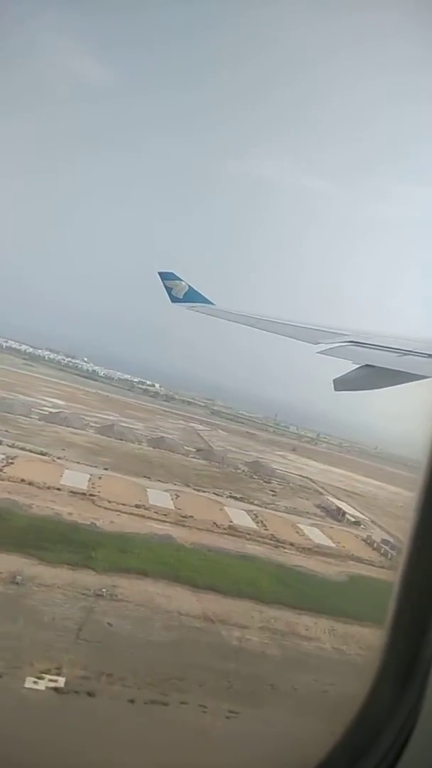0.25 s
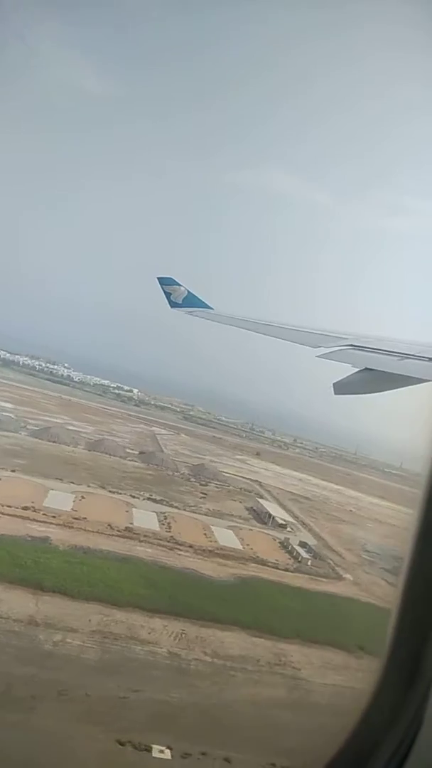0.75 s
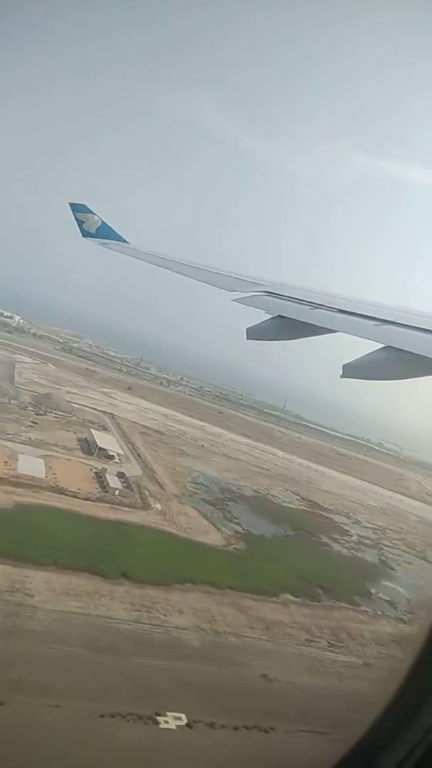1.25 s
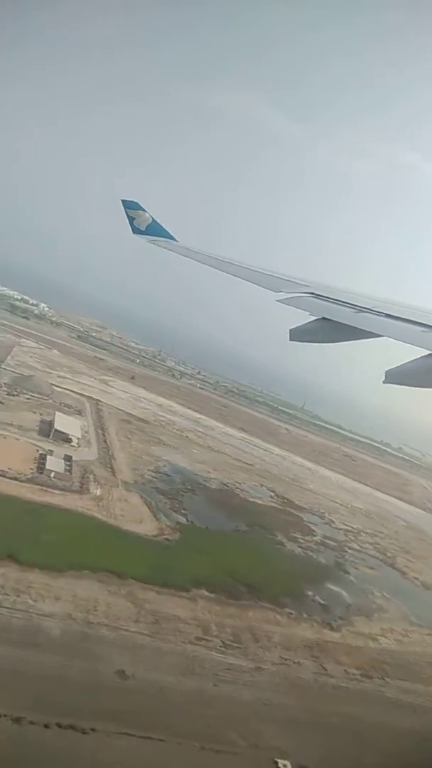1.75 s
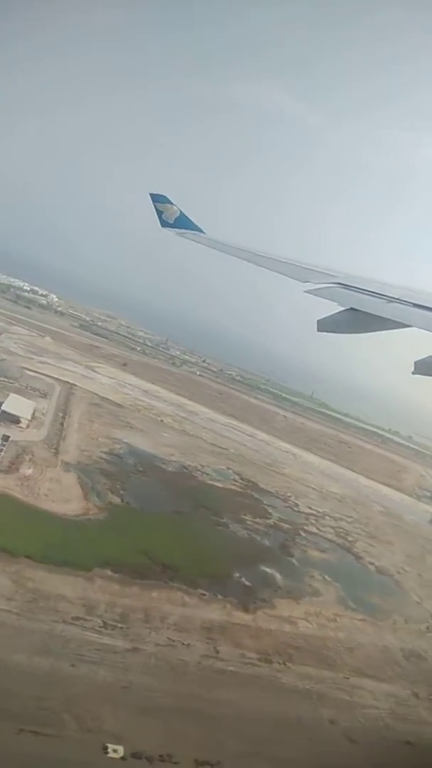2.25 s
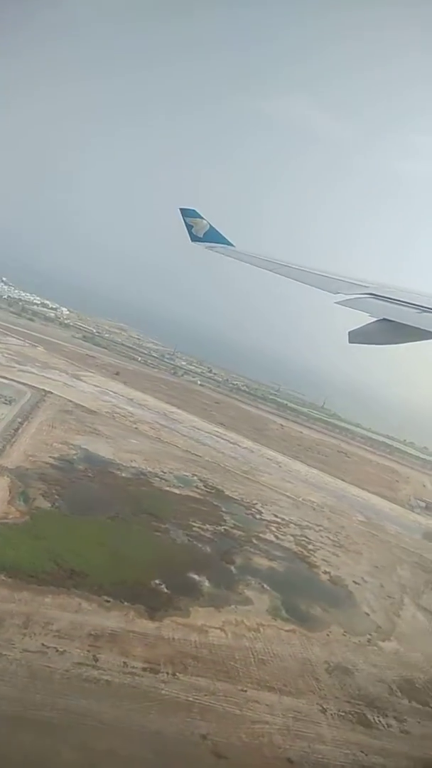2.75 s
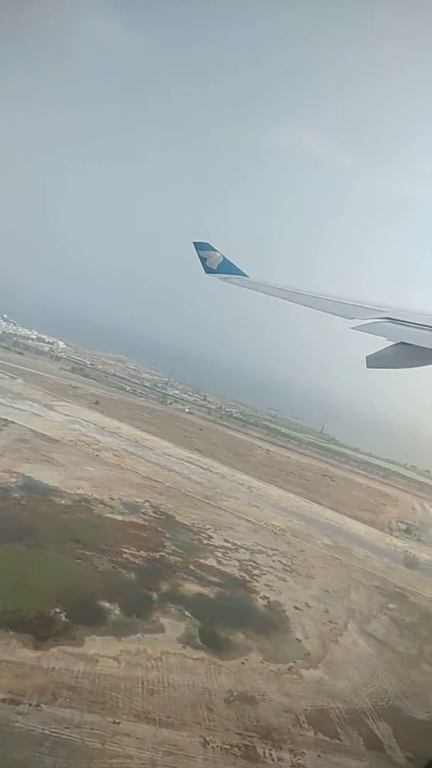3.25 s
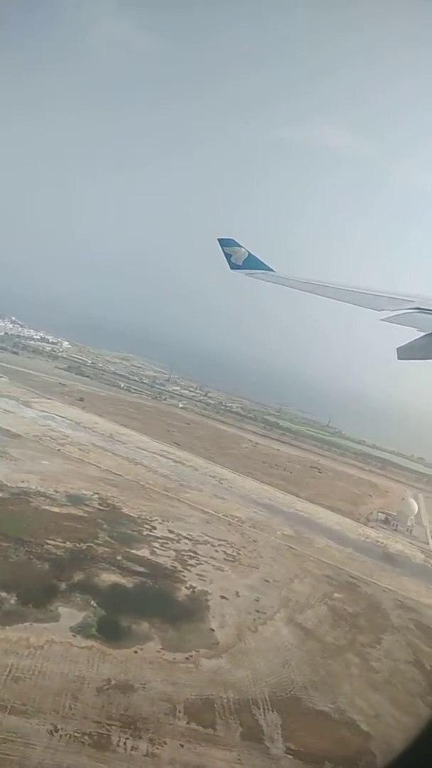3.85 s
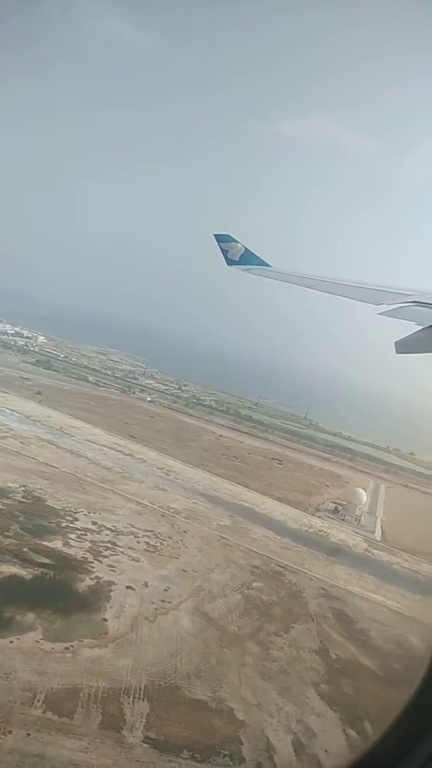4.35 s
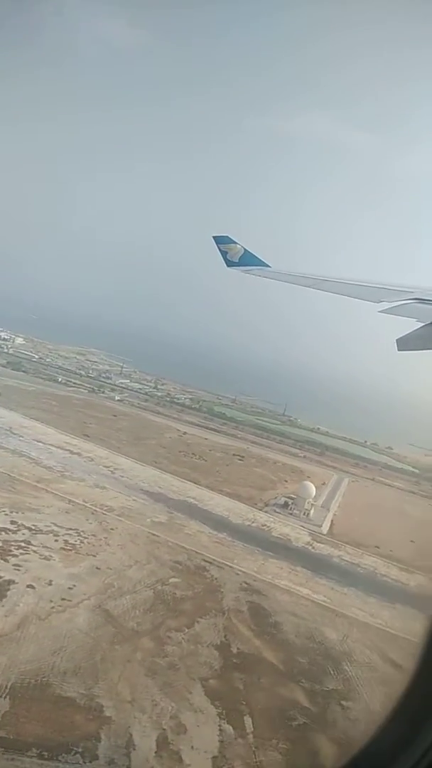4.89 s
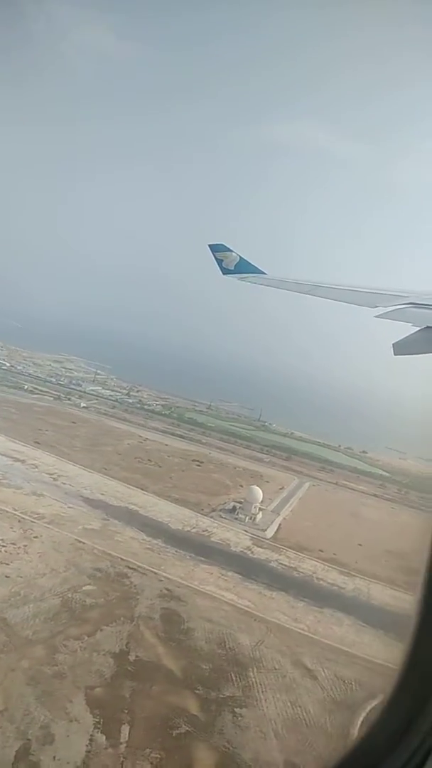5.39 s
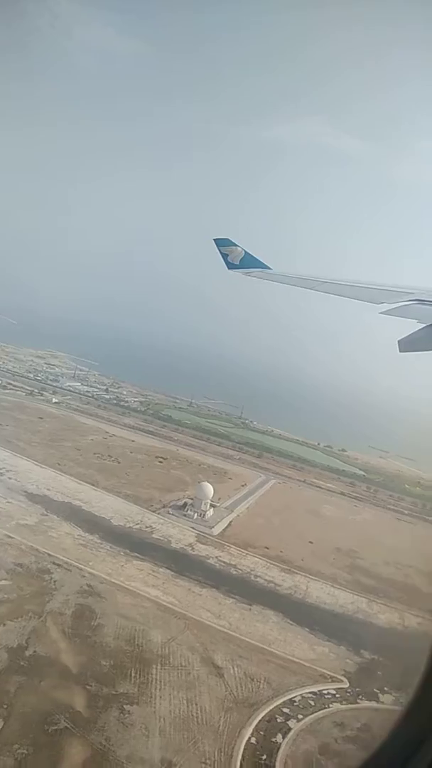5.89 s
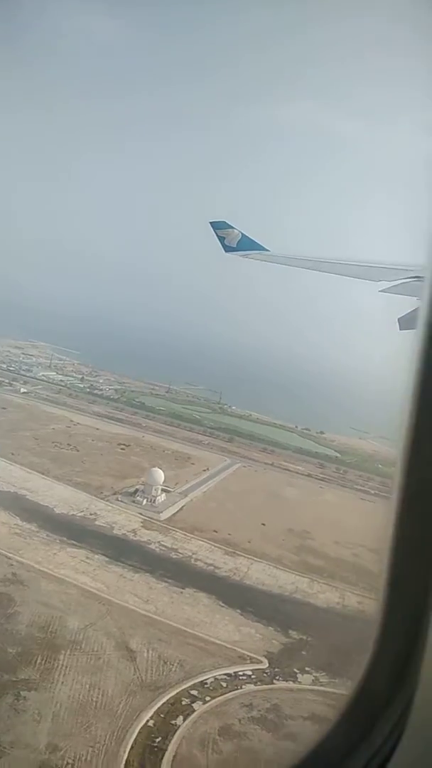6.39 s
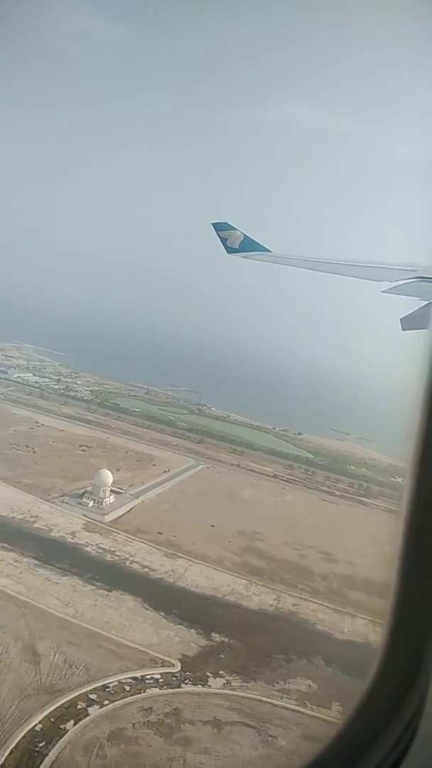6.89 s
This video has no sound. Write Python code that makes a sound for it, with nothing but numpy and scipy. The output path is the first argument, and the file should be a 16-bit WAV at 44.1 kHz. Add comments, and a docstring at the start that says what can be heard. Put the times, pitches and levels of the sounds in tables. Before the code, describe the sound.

Loud, low jet rumble wavers steadily inside an airliner cabin, with faint vent hiss and small handling rustles and ticks close to the microphone.

```python
"""Airliner cabin in the climb

Jet roar comes through the wall as a low, wavering rumble, to a phone held near the window; the window
recess colours it differently at each of two microphones. Air vents hiss: all are noise shaped in frequency.
The phone tilts and a hand rustles over it, lifting bands of that noise; fingers tick and ring the case,
loose trim crackles in tiny high clicks. A gate turns down weak treble bands and a limiter holds the peaks."""
import sys
import numpy as np
from scipy import signal
from scipy.io import wavfile
from scipy.ndimage import uniform_filter1d, minimum_filter1d

SR = 44100
rng = np.random.default_rng(int(sys.argv[2]) if len(sys.argv) > 2 else 0)


def level_to_linear(level):
    """Convert decibel levels to linear amplitude factors, elementwise."""
    exponent = np.asarray(level, float) / 20
    return 10 ** exponent


def master(y):
    """Save y as 16-bit WAV."""
    cut = np.clip(np.atleast_2d(y).T, -1, 1)
    pcm = np.round(cut * 32767)  # scale
    wavfile.write(sys.argv[1], SR, pcm.astype(np.int16))


N = 314433  # samples

# Uneven level of the low rumble, wavering by a few dB; its mean is the rms of the whole roar:
# start_s, level_db
RUMBLE_LEVEL = [(0, -14), (1.5, -13.5), (3, -13.5), (4.4, -15), (5.2, -13.5), (5.55, -16.5), (5.85, -15),
                (6.3, -16), (6.7, -14), (7.13, -12.5)]
# Rumble through the wall, relative power density: freq_hz, level_db (per Hz)
RUMBLE_SPECTRUM = [(12, -69.5), (20, -37.5), (43, -34.5), (65, -51.5), (91, -23), (139, -4.5), (190, 3),
                   (226, -6.5), (259, -1.5), (310, -6), (355, -13.5), (391, -16.5), (460, -30.5),
                   (520, -34), (680, -59), (1140, -120)]
# Rumble balance between the microphones: freq_hz, left_minus_right_db
RUMBLE_SIDES = [(40, 1), (70, -9), (110, -6.5), (190, 0.5), (320, 1), (400, -12), (500, -15.5)]
# Cabin booms and nulls in the rumble: centre_hz, width_hz, lift_db
CABIN_BOOMS = [(100, 20, 2), (198, 30, 2), (230, 16, -4), (268, 22, 2.5), (287, 14, -4), (305, 26, 1)]
# Recess resonances at each microphone, on the rumble's scale before trim: centre_hz, width_hz, level_db
RECESS_LEFT = [(610, 160, -33), (870, 120, -37.5), (1024, 240, -34), (1376, 200, -36.5), (1515, 82, -40.5),
               (1680, 330, -51), (1977, 400, -46), (2180, 160, -52.5), (2650, 79, -65.5), (2940, 260, -56),
               (3100, 150, -62.5), (3375, 120, -62), (3600, 150, -61), (3750, 130, -57.5),
               (4000, 81, -64.5), (4320, 120, -72), (4700, 220, -72.5), (5200, 400, -74)]
RECESS_RIGHT = [(580.2, 146, -21), (782, 130, -35.5), (1003, 84, -32.5), (1210, 170, -42),
                (1365, 74, -41.5), (1740, 210, -53.5), (2080, 160, -60.5), (2260, 180, -59),
                (2540, 170, -66.5), (2650, 180, -58.5), (2860, 320, -57.5), (3200, 110, -60),
                (3500, 500, -72), (3880, 170, -65.5), (4080, 190, -68), (4210, 170, -64), (4520, 180, -68),
                (4800, 220, -67), (5470, 220, -71)]
# Hiss of the air vents, on the rumble's scale before trim: freq_hz, left_db, right_db
VENT_HISS = [(4000, -90, -89), (5860, -88.5, -80), (7600, -84.5, -73), (8640, -78.5, -88), (8900, -66, -85),
             (9560, -85, -71), (10600, -82.5, -82.5), (11200, -78, -73), (11200, -82, -72),
             (12500, -71.5, -68.5), (13300, -83, -65.5), (14000, -86.5, -72.5), (14400, -115, -79.5),
             (15200, -120, -91.5)]
# Likeness of left and right noise, 1 same, 0 unrelated, below 0 opposed: freq_hz, likeness
STEREO_LIKENESS = [(25, .6), (45, .1), (80, 1), (200, 0.97), (350, 0.96), (480, 0.64), (650, 0),
                   (1100, -0.39), (1600, -0.21), (2000, -0.13), (3000, 0.15)]
# Treble mostly dulls as the phone tilts from the pane, before each microphone's share: start_s, lift_db
PHONE_TILT = [(0, 3.5), (.9, 3), (1.3, 2), (2.2, 1.5), (3.2, 0.5), (4.6, 0), (5.9, 1), (6.6, -0.5),
              (7.13, -5)]
# Passing swells of one band, before uneven strength: start_s, length_s, centre_hz, left_db, right_db
BAND_SWELLS = [(-.05, .3, 792, 5, 6.5), (1.249, 2.1, 1996, -0.5, 9.5), (1.551, .6, 770, 8, 3),
               (2.398, .85, 781, 4.5, 5), (5.999, .7, 783, 3, 6)]
# Flurries in the trim crackle: middle_s, half_length_s, extra_clicks_per_s
CRACKLE_FLURRIES = [(.6, .45, 50), (2.35, 0.13, 20), (4.2, 0.27, 50)]
# Strokes over the case, before band share and unevenness: start_s, length_s, left_db, right_db
HAND_STROKES = [(0.424, 0.21, 3, 2), (0.616, 0.19, 4.5, 7.5), (1.49, 0.29, 3, 9), (1.825, .4, 2.5, 4.5),
                (4.146, .3, 2, 1.5), (6.97, 0.16, 3.5, 6.5)]
# Bands a stroke lifts: centre_hz, width_hz, share_of_lift
STROKE_BANDS = [(4200, 4100, 0.93), (8500, 5600, .8)]
# Finger ticks, nominal level before the rings add up:
# start_s, level_db, blow_centre_hz, blow_spread_octaves, left_minus_right_db
FINGER_TICKS = [(0.4323, -41.5, 4200, 0.37, -9), (.667, -36.5, 2990, 0.81, -6.5),
                (1.473, -38.5, 4000, 3.9, -10.5), (4.85, -65, 5200, .15, 14.5), (5.15, -56, 5100, .2, 4.5),
                (5.489, -56.5, 11200, .2, 14.5), (5.904, -42, 4800, 0.2, 9.5),
                (6.253, -47.5, 7430, 1.9, 10), (6.56, -54.5, 5000, .15, 4)]
# Bands in which the case rings: centre_hz, width_hz, level_db, tail_t60_s
CASE_RINGS = [(1300, 900, 0, .08), (2260, 1300, 0, .1), (2950, 800, -3, .12), (4300, 1200, -7, .25),
              (5100, 1200, -5.5, .3), (6540, 2300, -10, .1), (8300, 1200, -7.5, .15),
              (9700, 1200, -5.5, .15), (10830, 1200, -1.5, 0.26), (12800, 2000, -12, .15)]


def evened(x):
    """Scales to rms 1."""
    return x / np.sqrt(np.mean(x ** 2) + 1e-20)


def read(points, hz):
    """Reads the columns of a spectrum table at hz, along a log frequency axis."""
    f, *values = np.transpose(points)
    return np.array([np.interp(np.log(hz + 1), np.log(f + 1), v) for v in values])


def bell(hz, centre_hz, width_hz, steep=2.43):
    """Power of a resonance with steep skirts."""
    return (1 + (2 * (hz - centre_hz) / width_hz) ** 2) ** -steep


def plateau(hz, centre_hz, width_hz):
    """A flat-topped band, 0-1."""
    return np.exp(-(2 * (hz - centre_hz) / width_hz) ** 4)


def stroke(t, start, length):
    """Quick start, flat middle, slower end, 0-1."""
    progress = np.clip((t - start) / length, 0, 1)
    return np.sqrt(abs(np.sin(np.pi * progress ** 0.7)))


def rumble(hz, waver_db):
    """Power of the jet rumble through the wall, with cabin booms and nulls, wavering in level."""
    level_db = read(RUMBLE_SPECTRUM, hz) + read(RUMBLE_SIDES, hz) * [[0.5], [-0.5]]
    level_db = level_db + sum(db * bell(hz, f, width) for f, width, db in CABIN_BOOMS)
    return level_to_linear(2 * level_db)[..., None] * level_to_linear(2 * waver_db)


def recess(hz, trim_db=-0.4):
    """Power of the upper roar, a sum of window recess resonances at each microphone."""
    sides = [sum(level_to_linear(2 * db) * bell(hz, f, width) for f, width, db in side)
             for side in (RECESS_LEFT, RECESS_RIGHT)]
    return np.array(sides)[..., None] * level_to_linear(2 * trim_db)


def hiss(hz, trim_db=-3.0):
    """Power of the steady air vent hiss at each microphone."""
    return level_to_linear(2 * (read(VENT_HISS, hz) + trim_db))[..., None]


def tilt(hz, t, from_hz=560, full_hz=3500, top_hz=7000, top_share=0.57, left_share=1, right_share=2.2):
    """Treble lift in dB as the phone tilts; the hiss from top_hz up keeps only part of it."""
    treble = read([(from_hz, 0), (full_hz, 1), (top_hz, top_share)], hz)[0]
    lift_db = np.interp(t, *np.transpose(PHONE_TILT))
    return np.multiply.outer([left_share, right_share], np.outer(treble, lift_db))


def swells(hz, t, scrape, width_over_centre=0.35):
    """Lift in dB as one band of the roar swells unevenly for a while."""
    lift_db = 0
    for start, length, f, *sides_db in BAND_SWELLS:
        band = plateau(hz, f, width_over_centre * f)
        lift_db = lift_db + np.multiply.outer(sides_db, np.outer(band, stroke(t, start, length) * scrape))
    return lift_db


def flicker(hz, frames, rms_db=2, from_hz=3800, full_hz=5500):
    """Random lift in dB: the whole treble flickers together, alike on both sides."""
    wobble = evened(uniform_filter1d(rng.standard_normal(frames), size=3))
    return np.outer(read([(from_hz, 0), (full_hz, rms_db)], hz)[0], wobble)


def stereo_noise(hz, frames, mid_db=2.1, treble_db=2, left_leads_rad=0.3):
    """Random spectra of two partly alike channels, and their slow patchiness in dB."""
    a, b, c, d, *patches = rng.standard_normal((frames, len(hz), 6)).T
    patches = uniform_filter1d(np.array(patches), 16, 1)  # wide in frequency
    patches = evened(uniform_filter1d(patches, 8, 2))  # slow in time
    depth_db = mid_db * np.minimum(hz / 600, 1) + treble_db * hz / 10000  # the bass is steadiest
    same = np.clip(read(STEREO_LIKENESS, hz)[0], -1, 1)[:, None]
    left = a + 1j * b
    right = same * left + np.sqrt(1 - same ** 2) * (c + 1j * d)
    right = right * np.exp(-1j * left_leads_rad)
    return np.array([left, right]), depth_db[:, None] * patches


def roar(rough=0.4):
    """Short-time noise spectra: rumble, recess and hiss add as powers, then the lifts shape bands."""
    frames, hz = N // 512 + 6, np.fft.rfftfreq(2048, 1 / SR)
    t = np.arange(frames) * 512 / SR
    rumble_db = np.interp(t, *np.transpose(RUMBLE_LEVEL))
    mean_db = rumble_db.mean()
    power = rumble(hz, rumble_db - mean_db) + recess(hz) + hiss(hz)
    # one uneven strength for strokes and swells
    scrape = 1 + rough * evened(uniform_filter1d(rng.standard_normal(frames), size=2))
    lift_db = tilt(hz, t) + swells(hz, t, scrape) + rustles(hz, t, scrape)
    lift_db = lift_db + flicker(hz, frames)
    noise, patchy_db = stereo_noise(hz, frames)
    spectra = noise * np.sqrt(power) * level_to_linear(lift_db + patchy_db)
    sound = signal.istft(spectra, nperseg=2048, noverlap=1536)[1][:, :N]
    return level_to_linear(mean_db) * evened(sound)


def crackle(least_db=-56, spread_db=4.5, hz=13500, width_hz=2500, clicks_per_s=4):
    """Loose trim near the right microphone: tiny high clicks at random, denser in flurries, a few large."""
    now = np.arange(N) / SR
    flurries = sum(more * np.exp(-((now - s) / half) ** 2) for s, half, more in CRACKLE_FLURRIES)
    size = level_to_linear(spread_db * np.minimum(rng.exponential(1, N), 2.5))
    size = size * (rng.random(N) < (clicks_per_s + flurries) / SR)
    t = np.arange(-64, 128) / SR
    click = np.exp(-(2 * width_hz * t) ** 2 / 2) * np.cos(2 * np.pi * hz * t)
    return np.outer([0, 1], level_to_linear(least_db) * signal.oaconvolve(size, click)[:N])


def rustles(hz, t, scrape):
    """Lift in dB as a hand strokes the case with uneven strength, in two broad treble bands."""
    rubbed = sum(share * plateau(hz, f, width) for f, width, share in STROKE_BANDS)
    lift_db = 0
    for start, length, *sides_db in HAND_STROKES:
        lift_db = lift_db + np.multiply.outer(sides_db, np.outer(rubbed, stroke(t, start, length) * scrape))
    return lift_db


def ticks(tail_db=-9, click_t60_s=0.022):
    """Each tick is a sharp click that rings the case bands near its centre, each with a noisy tail."""
    out, t = np.zeros((2, N)), np.arange(8192) / SR
    noises = rng.standard_normal((len(FINGER_TICKS), 2, len(t)))
    for (s, db, centre_hz, octaves, pan_db), noise in zip(FINGER_TICKS, noises):
        tick = 0
        for hz, width, ring_db, t60 in CASE_RINGS:
            click = noise[0] * level_to_linear(-60 * t / click_t60_s)  # the same on both sides
            burst = click + noise * level_to_linear(tail_db - 60 * t / t60)
            edges = [hz - width / 2, hz + width / 2]
            ring = signal.sosfilt(signal.butter(4, edges, "bandpass", fs=SR, output="sos"), burst)
            nearness = np.exp(-(np.log2(hz / centre_hz) / octaves) ** 2)
            tick = tick + level_to_linear(ring_db) * nearness * ring / abs(ring).max()
        part = out[:, round(s * SR):][:, :len(t)]  # a view: adding to it fills out
        sides = level_to_linear([[db + pan_db / 2], [db - pan_db / 2]])
        part += (sides * tick)[:, :part.shape[1]]
    return out


def scene():
    """All sources at the two microphones."""
    return roar() + crackle() + ticks()


def gate(x, knee_db=-95, depth_db=-25, from_hz=1500, tilt_db_per_octave=-5):
    """A gate turns down treble bands whose power falls under a sloping knee."""
    hz, _, z = signal.stft(x, SR, nperseg=1024, noverlap=768)
    power = uniform_filter1d(abs(z) ** 2, size=5, axis=1)  # over frequency
    power = uniform_filter1d(power, size=4, axis=2)  # over time
    power_db = 10 * np.log10(power + 1e-20)
    octaves = np.log2(np.clip(hz, 1, 6000) / 6000)[:, None]
    knee = knee_db + tilt_db_per_octave * octaves  # higher in the low treble
    shut = np.clip((knee - power_db) / 2, 0, 1) * (hz > from_hz)[:, None]
    return signal.istft(z * level_to_linear(depth_db * shut), nperseg=1024, noverlap=768)[1][:, :N]


def limit(x, ceiling_db=-3.4):
    """Limiter: turns both channels down together, smoothly, around peaks over the ceiling."""
    room = np.minimum(level_to_linear(ceiling_db) / (abs(x).max(0) + 1e-9), 1)
    gain = minimum_filter1d(room, size=801)
    gain = uniform_filter1d(uniform_filter1d(gain, size=400), size=400)
    return x * gain


def top_cut(x):
    """Nothing passes above the cut-off."""
    return signal.sosfilt(signal.butter(12, 15700, fs=SR, output="sos"), x)


def record(dry):
    """Treble gate, then limiter, to the finished mix."""
    mix = limit(gate(dry))
    return top_cut(mix)


dry = scene()
out = record(dry)
master(out)
```